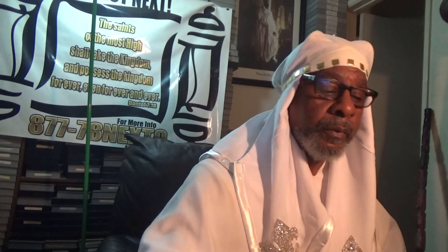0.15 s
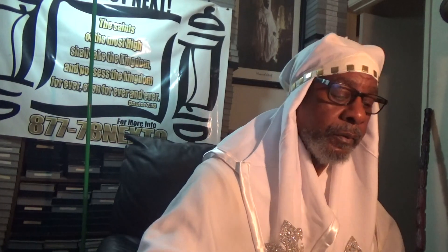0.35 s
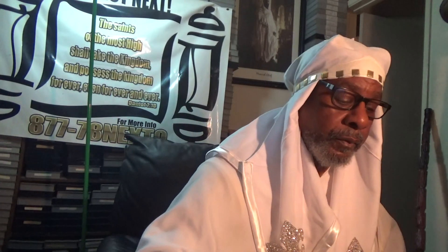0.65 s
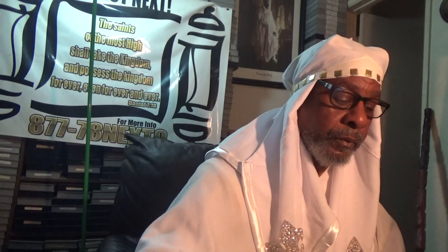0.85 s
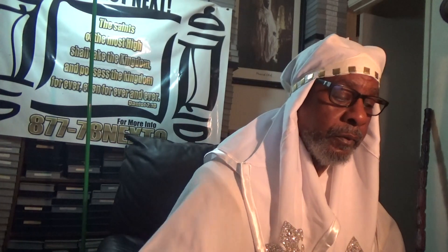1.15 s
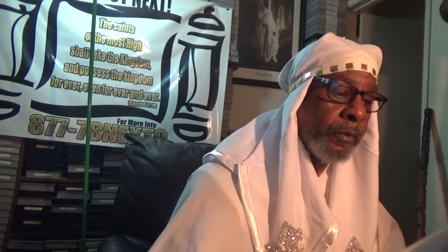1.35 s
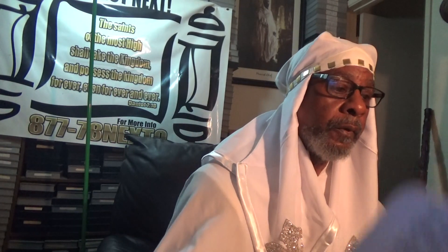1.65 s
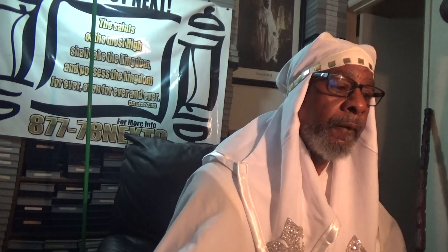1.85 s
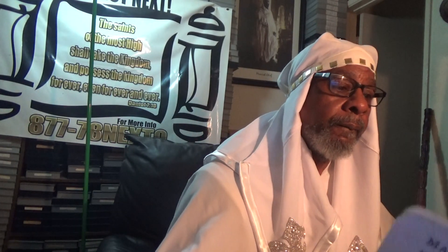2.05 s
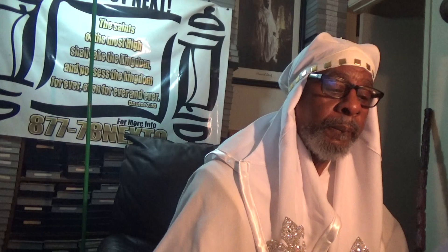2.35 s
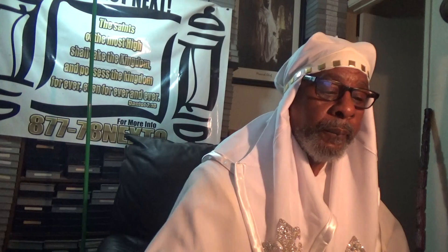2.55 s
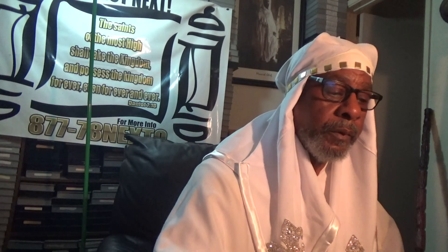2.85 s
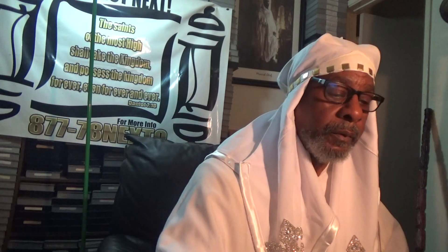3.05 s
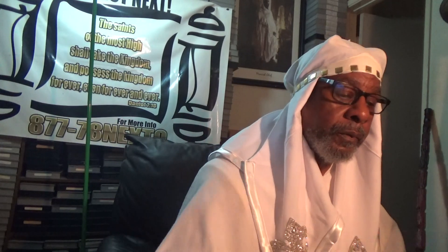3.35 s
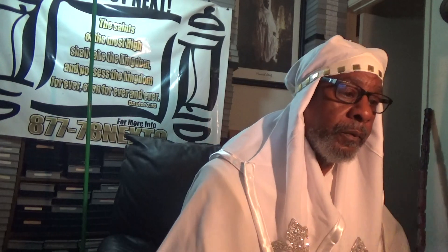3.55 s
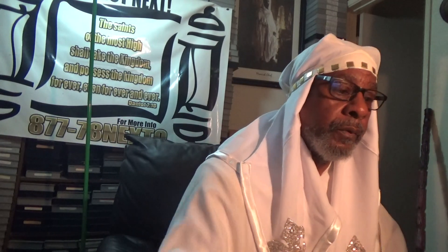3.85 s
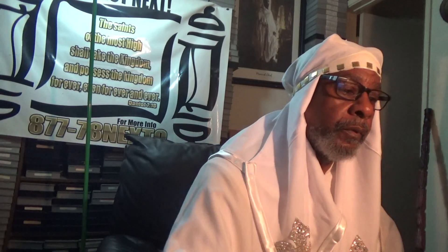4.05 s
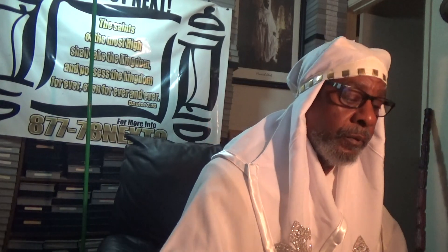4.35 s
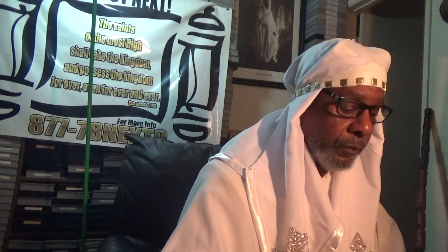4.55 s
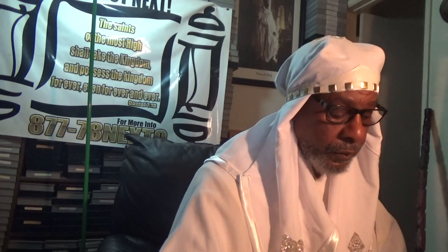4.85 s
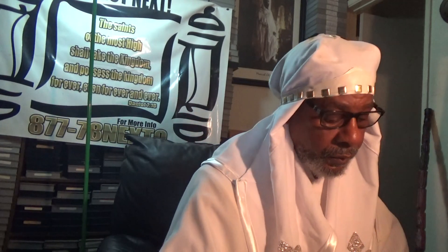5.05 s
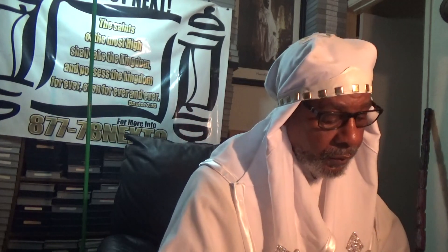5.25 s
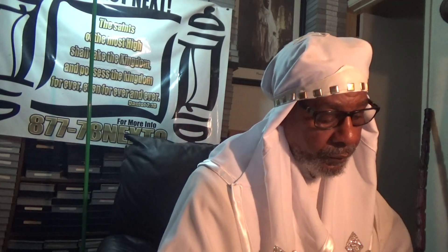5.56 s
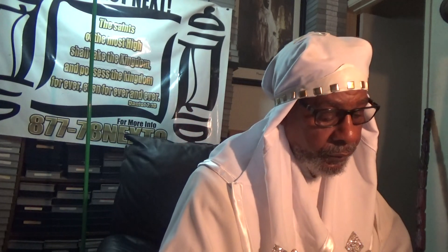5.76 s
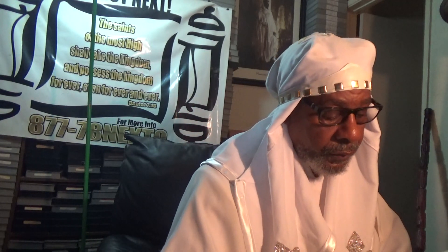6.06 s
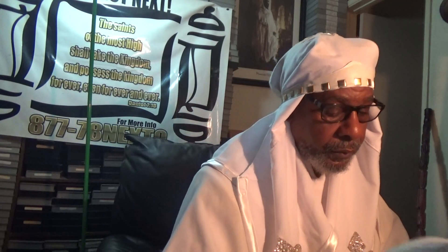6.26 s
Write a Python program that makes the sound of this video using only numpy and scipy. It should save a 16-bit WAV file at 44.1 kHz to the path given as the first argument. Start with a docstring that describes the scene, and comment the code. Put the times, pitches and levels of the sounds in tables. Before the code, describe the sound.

In a quiet, fairly dry room, thin pages are turned by hand right by the microphone. After a soft first second come irregular swishes, crinkles and small paper cracks, with a dense, louder flurry in the middle that ends in a dull flop. More flicks follow, then lighter sliding and a last page turn. Steady room hum and a faint, high, fast electrical ticking continue underneath.

```python
"""Leafing through a thin-paged book

A small furnished room, the book close to a stereo microphone. Sheets slide over each other with a
grainy hiss, buckle in sharp snaps and flop onto the stack with soft thumps. Behind them are a low
room hum and a faint electrical chirp, thirty times a second."""
import sys
import numpy as np
from scipy import signal
from scipy.fft import rfft, irfft, next_fast_len
from scipy.io import wavfile

SR = 44100
rng = np.random.default_rng(int(sys.argv[2]) if len(sys.argv) > 2 else 0)


def inscribe(sig):
    """Save sig as 16-bit PCM at rate SR to the path in sys.argv[1].

    A 1-D sig is mono; a 2-D sig holds one channel per row.
    Samples are clipped to [-1, 1] before scaling.
    """
    pcm = np.round(np.clip(np.atleast_2d(sig).T, -1, 1) * 32767)
    wavfile.write(sys.argv[1], SR, pcm.astype(np.int16))


N = 282681
TIME = np.arange(N) / SR


def from_db(db):
    """Decibels to gain."""
    return 10 ** (np.asarray(db) / 20)


def rms_one(x):
    """Scale to rms 1."""
    return x / np.sqrt(np.mean(x ** 2) + 1e-20)


def at_hz(points, hz):
    """Read a spectrum table on a log-frequency axis."""
    f, value = np.transpose(points)
    return np.interp(np.log(np.maximum(hz, 1)), np.log(f), value)


def cut(x, hz, kind, order=2):
    """Causal Butterworth filter."""
    return signal.sosfilt(signal.butter(order, hz, kind, fs=SR, output="sos"), x + 1e-18)


def split(x, hz):
    """The parts of a sound below and above a crossover."""
    return [cut(cut(x, hz, kind), hz, kind) for kind in ("low", "high")]


def colour(x, spectrum, size=2048):
    """Minimum-phase filter that follows a spectrum table."""
    gain = from_db(at_hz(spectrum, np.fft.rfftfreq(size, 1 / SR)))
    cepstrum = irfft(np.log(gain))
    cepstrum[1:size // 2] *= 2
    cepstrum[size // 2 + 1:] = 0
    return signal.fftconvolve(x, irfft(np.exp(rfft(cepstrum))))[:len(x)]


def drift(per_s):
    """Slow random wander of rms 1."""
    knots = rng.standard_normal(int(N / SR * per_s) + 2)
    return rms_one(np.interp(TIME * per_s, np.arange(len(knots)), knots))


def swell(start, length, attack_s, t60):
    """Attack, hold and dying away of one movement, as a gain."""
    t = TIME - start
    return np.clip(t / attack_s, 0, 1) * from_db(-60 * np.maximum(t - length, 0) / t60)


def pan(x, left_db):
    """Place a sound by the level of the left channel over the right."""
    gains = from_db([[left_db / 2], [-left_db / 2]])
    return x * gains / gains.mean()


def add(out, s, sound):
    """Mix a short sound in at time s."""
    start = round(s * SR)
    part = out[..., start:start + sound.shape[-1]]
    part += sound[..., :part.shape[-1]]


# The still air of the room. Each row: frequency in Hz, relative spectral level in dB.
AIR_SPECTRUM = [(12, -37), (20, -8.5), (70, -4.5), (98, -6), (187, -5.5), (319, -10), (590, -13.5),
                (718, -7), (780, -12), (1000, -11.5), (1190, -13.5), (2320, -16), (3160, -20),
                (3840, -21.5), (16000, -30.5)]
# How alike that air is in the two channels. Each row: frequency in Hz, likeness from 0 to 1.
AIR_LIKENESS = [(60, 1), (250, 0.84), (1000, 0.05), (4000, 0.57), (12000, 0.99)]
# Narrow hums in the background. Each row: centre in Hz, width in Hz, level in dB.
HUMS = [(185.3, 29, -74.5), (1045, 21, -73.5)]

def room_tone(air_db=-58):
    """Steady air noise, widest around 1 kHz, with two hums in the centre."""
    hz = np.fft.rfftfreq(N, 1 / SR)
    mid, side = rfft(rng.standard_normal((2, N))) * from_db(at_hz(AIR_SPECTRUM, hz))
    alike = at_hz(AIR_LIKENESS, hz)
    air = irfft(np.sqrt(1 + alike) * mid + np.sqrt(1 - alike) * side * [[1], [-1]], N)
    out = from_db(air_db) * rms_one(air)
    for centre, width, db in HUMS:
        hum = cut(rng.standard_normal(N), [centre - width / 2, centre + width / 2], "band")
        out += from_db(db) * rms_one(hum)
    return out


# A soft rumble, dead centre. Each row: time in seconds, level in dB.
RUMBLE_LEVEL = [(0, -62), (.2, -62.5), (.45, -72), (.7, -77), (.9, -87)]

def rumble(band_hz=(100, 260)):
    """Faint, dull noise that fades over the first second."""
    level_db = np.interp(TIME, *np.transpose(RUMBLE_LEVEL))
    return from_db(level_db) * rms_one(cut(rng.standard_normal(N), band_hz, "band"))


# The chirp behind the book fades and returns. Each row: time in seconds, gain in dB.
CHIRP_FADE = [(0, 2), (1.4, 2), (1.8, -7), (2.6, -10), (3.6, 3), (3.9, 3), (5.5, 1.5), (6.4, 2)]

def electrical_chirp(per_s=30, first_s=.0297, start_hz=2640, end_hz=3200, glide_s=.0028,
                     attack_s=.00034, t60=.062, base_db=-56, size=600):
    """A faint, regular electrical tick that glides up in pitch as it dies."""
    out, t = np.zeros(N), np.arange(size) / SR
    hz = end_hz + (start_hz - end_hz) * np.exp(-(t / glide_s) ** 2)
    envelope = (1 - np.exp(-t / attack_s)) * from_db(-60 * t / t60)
    tick = envelope * np.sin(2 * np.pi * np.cumsum(hz) / SR)
    for s in np.arange(first_s, N / SR, 1 / per_s):
        add(out, s, from_db(base_db + rng.normal(0, 1)) * tick)
    return out * from_db(np.interp(TIME, *np.transpose(CHIRP_FADE)))


# A hand draws one sheet over another, close to the microphone. Each row: start in seconds, length in
# seconds, friction (mid band) drive in dB, then body (lows) and sheen (highs) in dB relative to it.
STROKES = [(0, 0.32, -68, -3.5, -13), (0.148, 0.035, -62, -4, -6), (0.653, 0.072, -64, -9, -5),
           (.955, 0.057, -57, -21, -17), (1.017, 0.16, -47.5, -4, -10.5), (1.183, 0.052, -48, -6.5, -6.5),
           (1.253, .11, -53.5, -5, -8), (1.44, 0.26, -57.5, -2, -1), (1.686, .11, -62, 3.5, -3.5),
           (1.95, 0.067, -54, -3.5, 1), (2.026, .21, -48, -9.5, -3.5), (2.26, 0.11, -48.5, -10.5, -7),
           (2.681, 0.081, -49, -0.5, -7.5), (2.78, 0.21, -54, -3.5, -6.5), (2.909, 0.18, -54, -4, -3),
           (3.102, 0.088, -44, -7.5, -1), (3.19, 0.079, -41, -4.5, -4), (3.29, 0.22, -40, -5, -5.5),
           (3.517, .05, -47.5, -3.5, -12), (3.825, 0.062, -57, -2.5, 2.5), (3.876, 0.058, -42, -6, -1),
           (3.988, 0.34, -49.5, -3.5, -4.5), (4.343, .15, -48, -3.5, -6.5), (4.522, 0.058, -50, -7, -2),
           (4.656, 0.11, -53.5, -4, -5.5), (4.753, 0.085, -51.5, -11, -6), (4.893, .055, -46, -7.5, -7),
           (4.993, 0.45, -55.5, -3, -4), (5.136, 0.037, -46, -8.5, -11), (5.502, 0.32, -57, -4, -4),
           (5.845, 0.21, -51, -3.5, -6), (6.13, .2, -56.5, -4.5, -4.5), (6.323, .1, -50, -5, -7.5)]
# A page springs free and swishes to rest. Each row: start in seconds, friction drive in dB,
# then body and sheen in dB relative to it.
FLICKS = [(1.027, -49.5, -10, -0.5), (1.074, -50, -5, -10), (1.415, -51.5, -1, -4), (2.195, -44, -17, -0.5),
          (2.283, -42, -7, 0.5), (2.724, -47, -7, 3), (2.998, -49.5, -3, -2.5), (3.191, -34, -14, -4),
          (3.305, -35.5, -7, -3.5), (3.454, -30, -5, -4), (4.005, -52, -13, 3), (4.348, -48, -1, 0),
          (4.42, -41.5, -8, -5), (4.76, -40.5, -3, 0), (4.993, -48.5, -13, -18), (5.96, -38.5, -2.5, -4)]

def rubbing_levels(waver_db=1.06, floor_db=-72.5):
    """Strokes and flicks add up under uneven finger pressure: friction, body and sheen curves in dB."""
    moves = [(swell(s, length, attack_s=.016, t60=.2), *levels) for s, length, *levels in STROKES]
    moves += [(swell(s, length=.0047, attack_s=.0047, t60=.26), *levels) for s, *levels in FLICKS]
    power = sum((from_db([[db], [db + body], [db + sheen]]) * shape) ** 2
                for shape, db, body, sheen in moves)
    return 10 * np.log10(power + from_db(floor_db) ** 2) + waver_db * drift(per_s=30)


def clicks(per_s, spread_db, clump_db):
    """Random clicks of uneven size that come in clumps."""
    sizes = from_db(spread_db * np.minimum(rng.exponential(1, N), 4)) * rng.choice([-1, 1], N)
    return sizes * (rng.random(N) < per_s * from_db(clump_db * drift(per_s=60)) / SR)


def crinkles(ring_cycles=11, pitches=24):
    """Small facets of the sheet flip, each ringing briefly at a pitch set by its size."""
    flips = clicks(per_s=700, spread_db=4, clump_db=2.5)
    facet, out = rng.integers(0, pitches, N), np.zeros(N)
    for k, hz in enumerate(np.geomspace(450, 10000, pitches)):
        r, w = from_db(-60 * hz / (ring_cycles * SR)), 2 * np.pi * hz / SR
        resonator = [1 - r * r, 0, r * r - 1], [1, -2 * r * np.cos(w), r * r]
        out += signal.lfilter(*resonator, flips * (facet == k) + 1e-18)
    return rms_one(out)


def flexing(x, depth_db=2, per_s=45, count=20):
    """As a sheet bends its resonances shift, so each narrow band swells and fades on its own."""
    size = next_fast_len(N)
    band_index = at_hz([(400, 0), (14000, count - 1)], np.fft.rfftfreq(size, 1 / SR))
    spectrum = rfft(x, size)
    bands = (irfft(spectrum * np.maximum(1 - abs(band_index - k), 0), size)[:N] for k in range(count))
    return sum(band * from_db(depth_db * drift(per_s)) for band in bands)


# Rubbed paper at close range. Each row: frequency in Hz, relative spectral level in dB.
PAPER_SPECTRUM = [(60, -14), (150, -3.5), (350, 1), (700, -4), (1450, -0.5), (2300, -3.5), (3100, -2.5),
                  (4600, -5), (6000, -10), (9000, -10.5), (10800, -15), (12700, -24), (16000, -28)]

def sliding(friction_db, body_db, sheen_db, grain_db=-3.5, flutter_db=.97, trim_db=-1):
    """Fibres catch and let go over a smooth hiss. Bent sheets add body, flat gliding ones sheen."""
    slips = rms_one(clicks(per_s=900, spread_db=3.5, clump_db=4))
    grain = from_db(grain_db) * (slips + crinkles())
    rub = flexing(colour(grain + rng.standard_normal(N), PAPER_SPECTRUM))
    rub *= from_db(flutter_db * drift(per_s=70))
    low, upper = split(rub, hz=1200)
    middle, high = split(upper, hz=5000)
    friction = pan(from_db(friction_db) * rms_one(middle), left_db=-3.6)
    body = pan(from_db(body_db) * rms_one(low), left_db=-.5)
    sheen = pan(from_db(sheen_db) * rms_one(high), left_db=-.9)
    return from_db(trim_db) * (friction + body + sheen)


def small_buckles(friction_db, over_db=10.5, spread_db=2, centre_hz=3200, scatter_octaves=.82,
                  width_octaves=.92, ring_db=-2, count=110):
    """Lesser buckles come at random, their strength following the rubbing: rows for snaps()."""
    places = rng.random(count) * N
    scatter = rng.standard_normal((count, 2)).clip(-2, 2)
    return [(at / SR, friction_db[int(at)] + over_db + spread_db * loud,
             centre_hz * 2 ** (scatter_octaves * pitch), width_octaves, ring_db)
            for at, (loud, pitch) in zip(places, scatter)]


# Pages and hands land on the book, dead centre. Each row: start in seconds, peak in dB before the
# low cut, pitch in Hz, rise in seconds, time to fall 60 dB in seconds.
THUMPS = [(.633, -49, 281, 0.0018, 0.045), (1.143, -46, 660, .001, .03), (1.419, -35, 226, 0.0011, 0.055),
          (1.421, -43, 129, .002, 0.11), (1.420, -30.5, 870, 0.00047, 0.014),
          (1.699, -39.5, 327, 0.0011, 0.017), (1.746, -41.5, 125, 0.026, 0.21),
          (2.296, -41, 123, 0.0012, 0.039), (3.308, -45, 200, .002, 0.069),
          (3.458, -26.5, 206, 0.0016, 0.04), (3.458, -30, 93.5, 0.0021, 0.064),
          (4.424, -32, 398, 0.00061, 0.026), (4.434, -45, 129, 0.0033, 0.07),
          (5.978, -33.5, 423, 0.00064, 0.034)]

def thumps(wander_per_s=180, low_cut_hz=50, size=16384):
    """The stack and the air squeezed from under a page give a dull push of a few uneven cycles."""
    out, t = np.zeros(N), np.arange(size) / SR
    for s, db, hz, rise, t60 in THUMPS:
        envelope = np.minimum(t / rise, 1) * from_db(-60 * np.maximum(t - rise, 0) / t60)
        wander = np.interp(t * wander_per_s, np.arange(size), rng.standard_normal(size))
        add(out, s, from_db(db) * envelope * np.sin(2 * np.pi * hz * t + wander))
    return cut(out, low_cut_hz, "high")


def disperse(x, amount=.41, stages=3):
    """In a thin sheet high bending waves outrun low ones, which smears a click slightly."""
    for _ in range(stages):
        x = signal.lfilter([-amount, 1], [1, -amount], x)
    return x


# The treble of a snap as it reaches the microphone. Each row: frequency in Hz, gain in dB.
SNAP_TREBLE = [(5000, 1), (9000, 4.5), (12500, -8.5), (16000, -11)]

def fold_spectrum(hz, octaves, skirt=7, narrowing=.87):
    """The colour of one buckling fold: a hump around hz, tilted down 3 dB an octave, plus its treble."""
    f = np.geomspace(60, 20000, 48)
    away = np.log2(f / hz) / (narrowing * max(octaves, .2))
    hump_db = -5 * (skirt + 1) * np.log10(1 + away ** 2 / skirt)
    tilt_db = -10 * np.log10(np.maximum(f / hz, .5))
    return np.transpose([f, hump_db + tilt_db + at_hz(SNAP_TREBLE, f)])


# A sheet buckles loudly near the microphone. Each row: start in seconds, level in dB before the trim,
# centre in Hz, nominal width in octaves, ring of the sheet in dB relative to the snap.
LOUD_BUCKLES = [(1.0798, -24, 2100, 0.47, -14), (1.088, -34, 2500, 1.2, 1),
                (1.1433, -21.5, 1170, 0.55, -14), (1.1537, -33, 1800, 0.51, -6),
                (1.1673, -31, 1780, 1.1, -6), (1.231, -35, 2000, .8, 0), (1.42, -38, 1820, 1.34, 15),
                (1.4275, -30.5, 2200, 1, -22), (1.5869, -30.5, 1330, 0.68, -8),
                (1.6534, -34.5, 3300, 0.18, -8), (1.9336, -48.5, 4600, 1.3, 9), (2.036, -40, 6500, 0.91, 7),
                (2.0485, -36, 6030, 0.77, 9), (2.0621, -29, 4280, .4, -4), (2.112, -31, 5700, 0.67, -2),
                (2.1227, -35, 4540, .6, 1), (2.2756, -36, 9500, 1.3, -3), (2.29, -33, 3300, 0.34, -1),
                (2.2975, -31.5, 1890, 0.88, 3.5), (2.6465, -46.5, 4100, 1.8, 8.5),
                (2.7278, -22.5, 9000, .2, -9), (2.802, -34.5, 2550, 0.62, 2),
                (3.006, -30.5, 2520, 1.04, 1.5), (3.1579, -14.5, 4200, 0.38, -5),
                (3.166, -18.5, 4830, 0.33, -16), (3.1953, -16.5, 4420, 0.52, -11),
                (3.2027, -20, 4650, 0.38, -5), (3.2496, -30, 1960, 1.7, 7), (3.309, -19.5, 3900, 1.46, 8),
                (3.3562, -24.5, 2800, 1.1, -13), (3.4508, -24.5, 3420, 0.5, 9.5),
                (3.4586, -23, 2300, 0.95, 7), (3.4613, -12, 3100, 0.77, -3.5),
                (3.4644, -22.5, 1960, 0.77, 8.5), (3.4857, -27, 3660, 0.64, 9),
                (3.538, -25, 1880, 0.65, -1), (3.554, -28, 2100, 0.42, 1), (3.8887, -19.5, 6730, 1.1, -13),
                (3.9073, -19.5, 2650, 1.25, -5.5), (4.007, -33, 3840, 0.42, 4),
                (4.047, -30.5, 2720, .45, -11), (4.1661, -28, 4300, 1.3, -6), (4.3503, -34.5, 4400, 1.4, 9),
                (4.3537, -18, 2600, 0.67, -16), (4.3903, -26.5, 2900, 1.1, -5),
                (4.4134, -26, 2200, 1.4, -0.5), (4.4355, -31, 4100, .5, 3), (4.548, -32.5, 2080, 1.1, -11),
                (4.6231, -34, 3600, .3, -11), (4.7113, -30, 3650, 0.37, -3), (4.7686, -22, 5270, 1, -4),
                (4.777, -24.5, 4400, 0.18, -13), (4.8928, -32, 1790, 0.85, -8),
                (4.9154, -22, 3080, 1.06, -2.5), (5.245, -35.5, 3400, 0.69, -4),
                (5.3456, -35.5, 3530, 0.83, -1), (5.6513, -31.5, 2320, 0.88, 1.5),
                (5.765, -29, 2700, 0.51, -22), (5.848, -30.5, 3000, 0.7, -9), (5.9297, -34.5, 3600, 0.7, 8),
                (5.9613, -21, 4060, 0.48, 4.5), (5.978, -22.5, 1770, 1.4, 0),
                (6.0545, -31.5, 2560, .45, -6), (6.15, -40, 3330, .8, -2), (6.3009, -31.5, 2390, 1.2, -21)]
# Where a snap sits in the stereo image. Each row: centre in Hz, left over right in dB.
SNAP_PAN = [(1200, -2.5), (3500, -5.5), (7000, 1.5)]

def snaps(buckles, snap_s=.00068, drag_s=.0009, drag_db=-9.5, ring_cycles=30, trim_db=-3.5, size=1024):
    """A buckle flips and drags two neighbours along; bending waves die away, more slowly in low folds."""
    out, t = np.zeros((2, N)), np.arange(size) / SR
    noises, lags = rng.standard_normal((len(buckles), size)), rng.random((len(buckles), 2))
    for (s, db, hz, octaves, ring_db), noise, lag in zip(buckles, noises, lags):
        fold = fold_spectrum(hz, octaves)
        flips = np.sign(noise[-1]) * signal.unit_impulse(size)
        flips[(lag * drag_s * SR).astype(int) + 2] += from_db(drag_db) * np.sign(noise[-3:-1])
        crack = rms_one(disperse(colour(flips, fold, size)))
        ring = rms_one(colour(noise * from_db(-60 * t * hz / ring_cycles), fold, size))
        # the crack carries the energy of a burst of rms 1 lasting snap_s
        snap = (crack + from_db(ring_db) * ring) * np.sqrt(snap_s * SR / size)
        add(out, s, pan(from_db(db + trim_db) * snap, at_hz(SNAP_PAN, hz)))
    return out


# Page edges skim by, a little to the right. Each row: start in seconds, length in seconds, level in dB.
SKIMS = [(1.215, .025, -58), (1.567, 0.065, -61), (2.19, .04, -60), (3.305, .02, -48), (3.88, 0.045, -47),
         (4, .02, -58), (4.43, .015, -60)]

def skims(band_hz=(10000, 15000)):
    """A thin, very high, grainy hiss while an edge runs along the next sheet."""
    hiss = rms_one(clicks(per_s=2500, spread_db=3, clump_db=3)) + rng.standard_normal(N)
    level = sum(from_db(db) * swell(s, length, attack_s=.01, t60=.12) for s, length, db in SKIMS)
    return pan(level * rms_one(cut(hiss, band_hz, "band")), left_db=-3.5)


# Surfaces near the microphone, desk first. Each row: delay in seconds, level in dB.
ECHOES = [(.0031, -43), (.0082, -21.5)]

def room_reflections(x, t60=.21, build_s=.0022, tail_db=-15.5, wall_hz=7000, side_db=.5, size=16384):
    """Two near reflections and a short diffuse tail that differs between left and right."""
    t = np.arange(size) / SR
    mid, side = rng.standard_normal((2, size))
    diffuse = mid + from_db(side_db) * cut(side, 640, "high", order=1) * [[1], [-1]]
    tail = diffuse * from_db(-60 * t / t60) * (1 - np.exp(-t / build_s))
    response = from_db(tail_db) * rms_one(cut(tail, wall_hz, "low", order=1)) / np.sqrt(size)
    bounce = cut(signal.unit_impulse(size), wall_hz, "low", order=1)
    for delay, db in ECHOES:
        add(response, delay, from_db(db) * bounce)
    return signal.fftconvolve(x.mean(axis=0)[None], response, axes=1)[:, :N]


def scene():
    """The book up close, the quiet room behind it."""
    friction_db, body_db, sheen_db = rubbing_levels()
    book = sliding(friction_db, body_db, sheen_db)
    book += snaps(LOUD_BUCKLES + small_buckles(friction_db)) + thumps() + skims()
    return book + room_reflections(book) + room_tone() + rumble() + electrical_chirp()


def record(dry, cutoff_hz=16000):
    """The microphone signal, its top cut steeply."""
    return signal.sosfilt(signal.ellip(10, .1, 80, cutoff_hz, fs=SR, output="sos"), dry)


dry = scene()
out = record(dry)
inscribe(out)
```